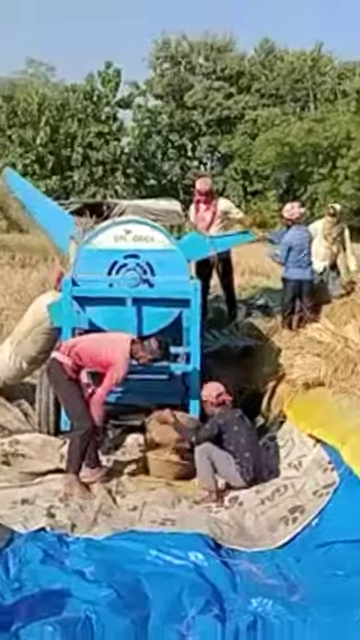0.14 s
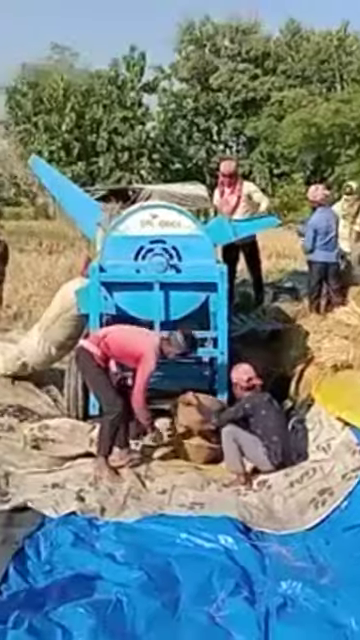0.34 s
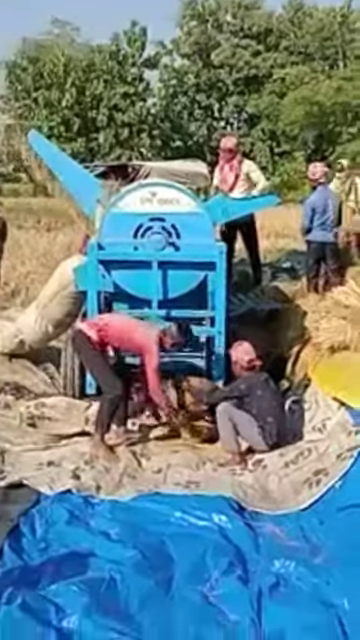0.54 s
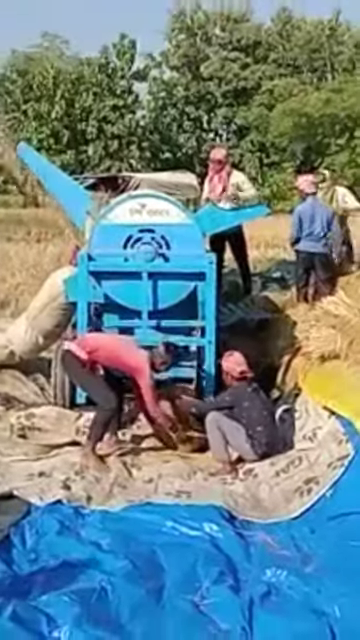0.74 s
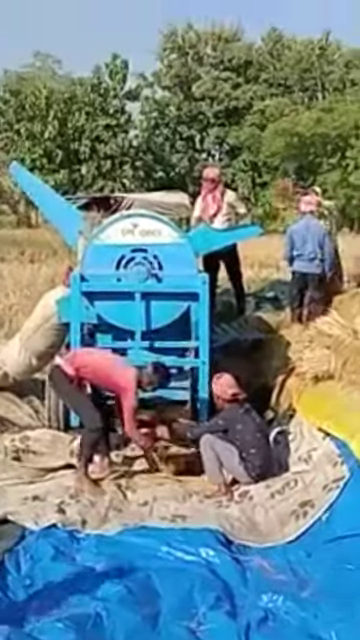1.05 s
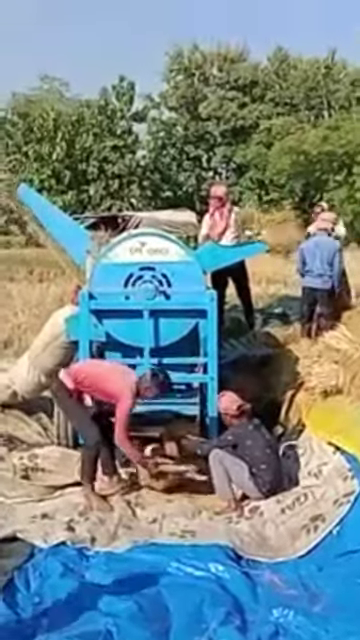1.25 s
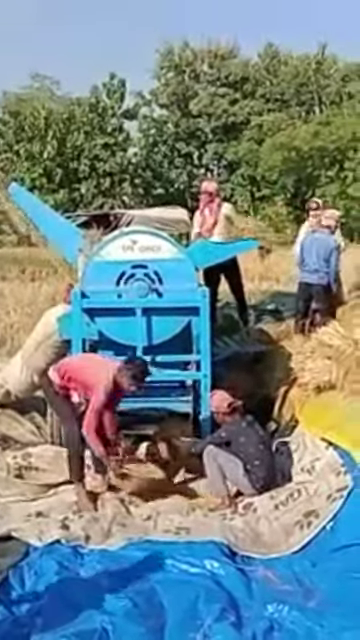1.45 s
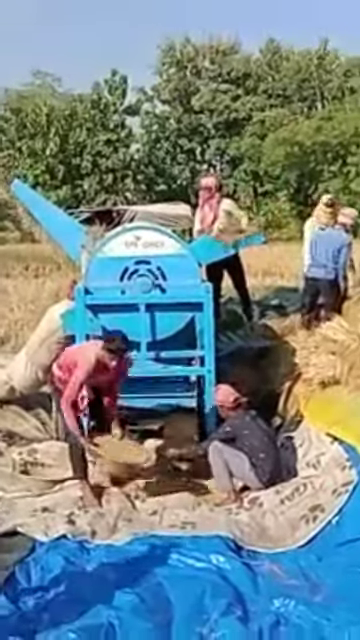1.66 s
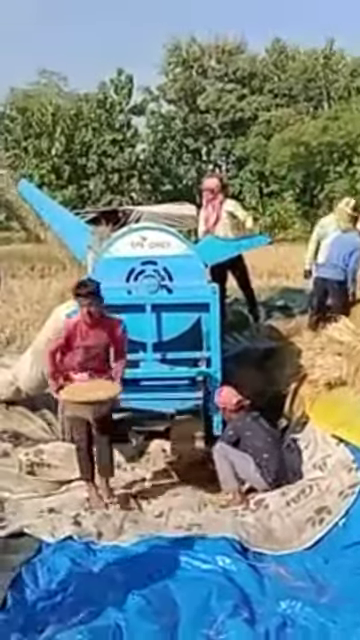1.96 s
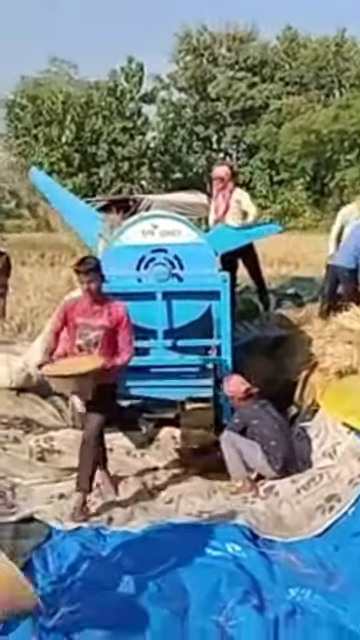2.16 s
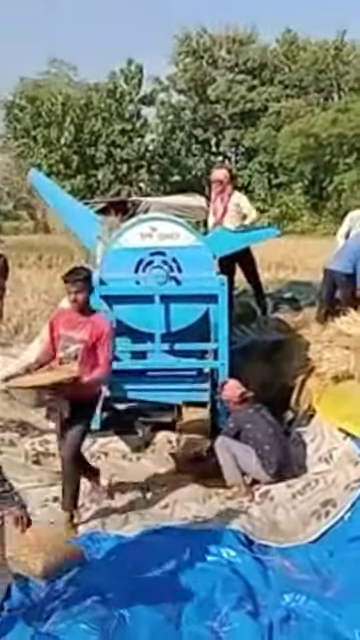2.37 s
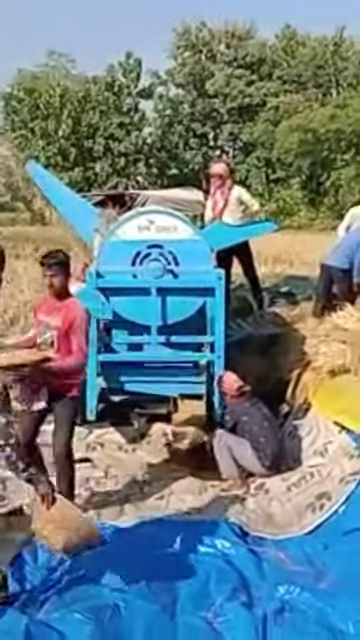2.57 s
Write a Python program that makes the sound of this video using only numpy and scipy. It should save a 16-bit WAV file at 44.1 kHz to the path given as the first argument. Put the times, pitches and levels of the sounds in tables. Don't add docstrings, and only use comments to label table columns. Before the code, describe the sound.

A threshing machine roars steadily in an open field, its engine booming and loose metal panels rattling

```python
import sys
import numpy as np
from scipy import signal
from scipy.fft import rfft, irfft
from scipy.io import wavfile
from scipy.ndimage import uniform_filter1d

SR = 44100
rng = np.random.default_rng(int(sys.argv[2]) if len(sys.argv) > 2 else 0)


def int16_out(signal):
    q = np.round(np.clip(np.atleast_2d(signal).T, -1, 1) * 32767)
    wavfile.write(sys.argv[1], SR, q.astype(np.int16))


def natural_amplitude(level_db):
    exponent = np.asarray(level_db, float) / 20
    return 10 ** exponent


N = 119952


def level(x, db):
    return x * natural_amplitude(db) / np.sqrt(np.mean(x ** 2))


def curve(table, col):
    rows = np.array(table, float)
    return np.interp(np.arange(N) / SR, rows[:, 0], rows[:, col])


def colour(x, points):
    points = np.array(points, float)
    hz = np.fft.rfftfreq(N, 1 / SR) + 1
    gain_db = np.interp(np.log(hz), np.log(points[:, 0]), points[:, 1])
    return irfft(rfft(x) * natural_amplitude(gain_db), N)


def ring(x, hz, width_hz):
    return signal.lfilter(*signal.iirpeak(hz, hz / width_hz, fs=SR), x)


def ring_twice(x, hz, width_hz):
    return ring(ring(x, hz, width_hz), hz, width_hz)


def walk(rate):
    hold = int(SR / rate)
    steps = np.repeat(rng.standard_normal(N // hold + 1), hold)
    return 1.236 * uniform_filter1d(uniform_filter1d(steps, hold), hold)[:N]


def blower_roar():
    # pitch in Hz, loudness in dB per Hz.
    roar_shape = [(30, -12), (114, -3), (404, -9.5), (868, -5.5), (1400, -15), (2420, -16.5), (7620, -19),
                  (9000, -21.5)]
    roar = np.zeros(N)
    for hz in 35 * 2 ** np.arange(0, 9, 1 / 3):
        band = ring(rng.standard_normal(N), hz, hz / 4)
        roar += level(band, 10 * np.log10(hz)) * natural_amplitude(1.6 * walk(18))
    return level(colour(roar, roar_shape), -39.5)


def drum_casing():
    # pitch in Hz, width in Hz, level in dB, flicker in dB.
    casing_modes = [(278, 81, -53, 3), (504, 50, -53, 3), (849, 77, -51, 3), (1038, 38, -65, 0),
                    (1820, 256, -52, 3.5)]
    out = np.zeros(N)
    for hz, width_hz, db, flicker_db in casing_modes:
        hum = ring_twice(rng.standard_normal(N), hz, width_hz * 1.8)
        out += level(hum, db) * natural_amplitude(flicker_db * walk(17))
    return out


def bursts_of_ringing(bursts, waver):
    t, out = np.arange(N) / SR, np.zeros(N)
    drift = np.cumsum(walk(90)) / SR
    shake_db = 4.2 * walk(150)
    for (start, hz, db, long_s), turn in zip(bursts, rng.random(len(bursts))):
        near = slice(max(int((start - 4 * long_s) * SR), 0), int((start + 4 * long_s) * SR))
        late = int(turn * N)
        wavering_t = t[near] + waver * np.roll(drift, late)[near]
        tone = np.sqrt(2) * np.sin(2 * np.pi * (hz * wavering_t + turn))
        swell = np.exp(-.5 * ((t[near] - start) / long_s) ** 2)
        out[near] += natural_amplitude(db + np.roll(shake_db, late)[near]) * swell * tone
    return out


def loose_metal():
    # time in seconds, pitch in Hz, level in dB, length in seconds.
    panel_rattles = [(0.311, 857, -45, 0.015), (0.385, 859, -39.5, 0.019), (0.512, 855, -48.5, 0.039),
                     (0.545, 238, -45, 0.013), (0.559, 853, -44, 0.015), (0.694, 845, -48.5, 0.018),
                     (0.721, 225, -42.5, 0.015), (0.864, 289, -47.5, 0.026), (0.928, 870, -50, 0.016),
                     (1.002, 880, -43.5, 0.0095), (1.141, 272, -46, 0.023), (1.161, 908, -42, 0.008),
                     (1.221, 850, -45, 0.028), (1.313, 815, -40, 0.012), (1.37, 907, -48, 0.01),
                     (1.428, 270.2, -45.5, 0.018), (1.475, 855, -41.5, 0.018), (1.55, 1050, -44.5, 0.021),
                     (1.683, 267, -39.5, 0.015), (1.707, 1060, -47.5, 0.012), (1.8, 872, -40.5, 0.014),
                     (1.835, 237, -40, 0.018), (1.896, 885, -45, 0.013), (2.017, 265.7, -41, 0.022),
                     (2.044, 831, -46.5, 0.02), (2.09, 264, -41.5, 0.009), (2.217, 857, -45.5, 0.03),
                     (2.292, 226.5, -42, 0.014), (2.317, 665, -45, 0.011), (2.378, 780, -43.5, 0.018),
                     (2.403, 270, -41, 0.015), (2.51, 253.4, -45.5, 0.016), (2.548, 870, -46, 0.024)]
    long_rings = [
        (.172, 865, -41, .035),
        (2.09, 1085, -49, .045),
        (2.285, 2450, -44.5, 0.024),
        (2.31, 7650, -43, .05),
    ]
    return bursts_of_ringing(panel_rattles, 0.0159) + bursts_of_ringing(long_rings, 0.0159)


def struck_metal():
    # time in seconds, pitch in Hz, level in dB, length in seconds.
    clangs = [(0.393, 2430, -53, 0.008), (0.496, 2190, -48, 0.011), (0.6, 2500, -50, 0.013),
              (0.662, 2860, -42, 0.0081), (0.689, 4460, -49, 0.026), (0.699, 2250, -47, 0.0084),
              (0.713, 1690, -47, 0.01), (0.777, 4520, -48, 0.013), (0.777, 6080, -48, 0.011),
              (0.796, 5630, -49, 0.018), (0.814, 2260, -45.5, 0.011), (0.819, 6130, -46, 0.013),
              (0.822, 2550, -46, 0.011), (0.846, 3180, -43.5, 0.015), (0.852, 5740, -55, 0.0091),
              (0.856, 3020, -43.5, 0.01), (0.857, 6190, -51, 0.012), (0.871, 3800, -48.5, 0.013),
              (0.917, 2270, -44, 0.0087), (1.465, 2530, -49, 0.015), (1.485, 2300, -45.5, 0.018),
              (1.488, 1910, -47, 0.01), (1.489, 4660, -52, 0.01), (1.564, 4360, -51, 0.01),
              (1.608, 5560, -50, 0.01), (1.612, 1934, -50, 0.016), (1.613, 2840, -45, 0.011),
              (1.616, 2380, -52, 0.017), (1.626, 5020, -52, 0.016), (1.736, 2067, -47, 0.017),
              (1.882, 6170, -48, 0.017), (1.905, 2380, -48, 0.013), (2.055, 2520, -46.5, 0.014),
              (2.101, 2220, -43, 0.0086), (2.12, 6180, -49, 0.018), (2.163, 4360, -48.5, 0.025),
              (2.181, 2510, -47, 0.011), (2.223, 6050, -50, 0.016), (2.299, 6170, -41.5, 0.0081),
              (2.31, 5650, -54, 0.017), (2.318, 3940, -49, 0.013), (2.33, 2450, -41.5, 0.018),
              (2.361, 1800, -47.5, 0.014), (2.389, 3950, -49, 0.013), (2.495, 2420, -39.5, 0.0084),
              (2.564, 2500, -45.5, 0.011), (2.582, 5700, -46, 0.008), (2.604, 2440, -42, 0.0074)]
    tinkles = [(0.771, 7410, -47, 0.013), (0.824, 7870, -55, 0.0099), (0.88, 7820, -51, 0.018),
               (0.982, 7740, -45, 0.01), (1.089, 7160, -45, 0.013), (1.104, 6910, -44, 0.013),
               (1.146, 7630, -49, 0.018), (1.265, 7380, -47, 0.013), (1.34, 7620, -48, 0.022),
               (1.387, 7080, -50, 0.011), (1.401, 7950, -46, 0.016), (1.406, 7560, -52, 0.023),
               (1.473, 7640, -41, 0.01), (1.566, 7660, -45.5, 0.015), (1.72, 7630, -44, 0.011),
               (1.908, 7730, -46, 0.034), (1.939, 7650, -56, 0.01), (2.055, 7820, -42.5, 0.012),
               (2.07, 7300, -44, 0.013), (2.11, 7310, -43, 0.01), (2.133, 6920, -45, 0.01),
               (2.153, 7600, -45, 0.048), (2.239, 7660, -37.5, 0.013), (2.37, 7610, -39, 0.015),
               (2.388, 7360, -46, 0.013), (2.414, 7810, -44, 0.016), (2.632, 7530, -46.5, 0.023),
               (2.68, 7650, -45, 0.014)]
    return bursts_of_ringing(clangs, 0.0081) + bursts_of_ringing(tinkles, .007)


def pelting(bodies, load_db):
    hits_per_s, scatter_db = 9000, 2.0
    out = np.zeros(N)
    for hz, width_hz, db in bodies:
        struck = rng.random(N) < hits_per_s / SR
        size_db = scatter_db * np.minimum(rng.exponential(size=N), 4)
        hits = struck * rng.standard_normal(N) * natural_amplitude(size_db)
        out += level(ring_twice(hits, hz, width_hz * 1.54), db) * natural_amplitude(1.93 * walk(16))
    return out * natural_amplitude(load_db)


def grain_on_panels(load_db):
    # pitch in Hz, width in Hz, level in dB.
    panels = [(2378, 366, -3.5), (3040, 400, -9.5), (3865, 340, -12), (4360, 220, -14.5), (5650, 140, -13),
              (6180, 160, -8.5), (3400, 4600, -8)]
    return pelting(panels, load_db)


def chaff_in_spout(load_db):
    # pitch in Hz, width in Hz, level in dB.
    spout = [(7644, 160, -4.5), (8040, 220, -6.5), (7090, 630, -3), (9290, 160, -11.5), (11600, 300, -10)]
    return pelting(spout, load_db)


def grain_pings(load_db):
    spurts_per_s, spurt_db, sharpness = 14, 8.5, 90
    out = np.zeros(N)
    for hz in 1650 * 2 ** np.arange(0, 2.3, 1 / 20):
        spurts = rng.standard_normal(N) * natural_amplitude(spurt_db * np.minimum(walk(spurts_per_s), 1.6))
        out += level(ring_twice(spurts, hz, hz / sharpness), 2.0 * np.log2(hz))
    return level(out, -4) * natural_amplitude(load_db)


def shaker():
    # time in seconds, thump in dB, tray ring in dB.
    strokes = [(0.449, -59, -47.5), (0.664, -36.5, -45.5), (0.884, -41, -53), (1.0, -48, -47.5),
               (1.1, -38, -58), (1.325, -37.5, -57), (1.38, -48, -48), (1.45, -55, -45),
               (1.551, -47, -51.5), (1.76, -53, -54), (1.84, -69, -42), (1.899, -58, -40.5),
               (1.979, -39, -50), (2.213, -38, -74), (2.301, -66, -36.5), (2.43, -46, -45),
               (2.589, -33.5, -70), (2.66, -39, -51)]
    thump_hz, thump_s = 83.2, 0.016
    tray_hz, tray_width_hz, tray_s = 501.4, 30.2, 0.023
    t, out = np.arange(N) / SR, np.zeros(N)
    wobble = np.cumsum(tray_width_hz * 0.41 * walk(70)) / SR
    tray = np.sqrt(2) * np.sin(2 * np.pi * (tray_hz * t + wobble)) * natural_amplitude(2.2 * walk(70))
    for start, thump_db, tray_db in strokes:
        since = t - start
        thump = np.exp(-.5 * (since / thump_s) ** 2) * np.sin(2 * np.pi * thump_hz * since)
        out += 1.33 * natural_amplitude(thump_db) * thump
        out += natural_amplitude(tray_db) * np.exp(-.5 * (since / tray_s) ** 2) * tray
    return out


def engine():
    # time in seconds, boom pitch in Hz (four times the firing rate), boom level in dB.
    boom_path = [(0.16, 117.6, -58), (0.28, 117.6, -38.5), (0.53, 117.9, -34.5), (0.79, 116.1, -66),
                 (0.84, 115.5, -54.5), (1.3, 114.8, -36), (1.88, 115.0, -47.5), (2.21, 114.8, -34.5),
                 (2.27, 114.3, -45), (2.54, 113.7, -30), (2.58, 113.7, -27.5), (2.72, 113.8, -44)]
    cylinders_db = [-0.5, -2.5, -2]
    # pitch in Hz, width in Hz, level in dB.
    pipe_modes = [(47.7, 22, -13), (59.6, 44, -14), (86.5, 23, -10), (114.53, 10.6, -4), (141.6, 19, -13),
                  (234.5, 32, -10), (266, 39, -8), (304, 17, -14)]
    boom_order = 4
    boom_db = curve(boom_path, col=2)
    turns = np.cumsum(curve(boom_path, col=1) / boom_order) / SR + 0.2996

    fires = np.flatnonzero(np.diff(np.floor(turns)))
    late_s = .0008 * rng.standard_normal(len(fires))
    strength_db = np.resize(cylinders_db, len(fires)) + 3.9 * rng.standard_normal(len(fires))
    pulses = np.zeros(N)
    pulses[np.clip(fires + (SR * late_s).astype(int), 0, N - 1)] = natural_amplitude(strength_db)
    pipe = sum(level(ring_twice(pulses, hz, width_hz), db) for hz, width_hz, db in pipe_modes)

    surge = walk(21.97)
    tone = np.sqrt(2) * np.sin(2 * np.pi * boom_order * turns + .8 * surge[::-1])
    throb_db = 3.2 * np.cos(2 * np.pi * (turns - .2))
    boom = tone * natural_amplitude(boom_db - 7 + 2.2 * surge + throb_db)
    return level(pipe * natural_amplitude(0.25 * boom_db), -43.5) + boom


def scene():
    # time in seconds, grain load in dB, chaff through the spout in dB.
    feed = [(0.22, -52, -46), (0.27, -46, -45), (0.37, -44.5, -45), (0.74, -42.5, -45.5),
            (0.85, -37, -41.5), (0.92, -44, -52), (0.98, -45, -49), (1.01, -44, -46.5), (1.44, -45, -44),
            (1.61, -43, -47.5), (1.66, -44.5, -47.5), (2.19, -43, -48.5), (2.23, -41.5, -39),
            (2.29, -39, -43.5), (2.38, -41, -41), (2.43, -45, -47), (2.56, -41.5, -45.5),
            (2.62, -45, -45.5), (2.72, -44, -56)]
    grain_db, chaff_db = curve(feed, col=1), curve(feed, col=2)
    background = blower_roar() + drum_casing()
    metal = loose_metal() + struck_metal()
    crop = grain_on_panels(grain_db) + grain_pings(grain_db) + chaff_in_spout(chaff_db)
    return (background + metal + crop + shaker() + engine())[None]


def low_pass(x):
    return signal.sosfilt(signal.butter(12, 15520, fs=SR, output="sos"), x)


def record(dry):
    # time in seconds, level in dB.
    fade = [
        (.122, -61),
        (.132, -31.5),
        (.143, -14),
        (.2, -7),
        (.3, -2.5),
        (.42, 0),
    ]
    # pitch in Hz, level in dB.
    treble = [(8000, 0), (8600, 2), (9400, -7), (9900, -14), (11500, -22.5), (12900, -24), (13600, -19),
              (14300, -29)]
    t = np.arange(N) / SR
    bass_cut = signal.butter(3, 42.8, "high", fs=SR, output="sos")
    thin = signal.sosfilt(bass_cut, dry[0])
    heard = colour(thin, treble) * natural_amplitude(curve(fade, col=1)) * (t > fade[0][0])
    return low_pass(heard[None])


dry = scene()
out = record(dry)
int16_out(out)
```